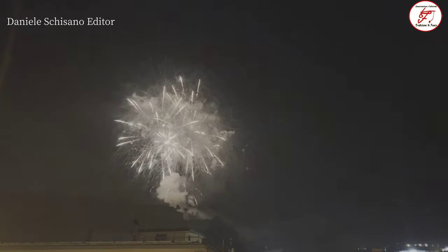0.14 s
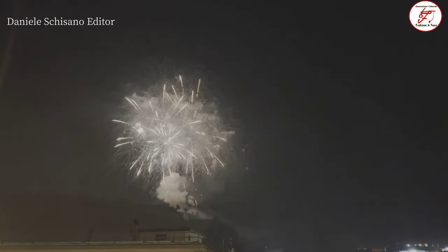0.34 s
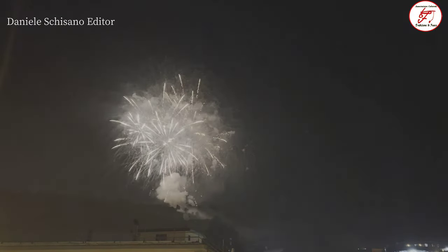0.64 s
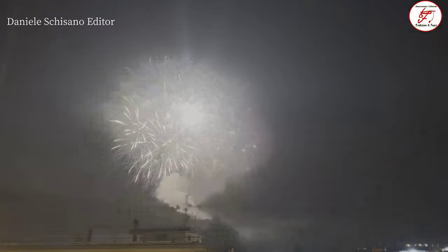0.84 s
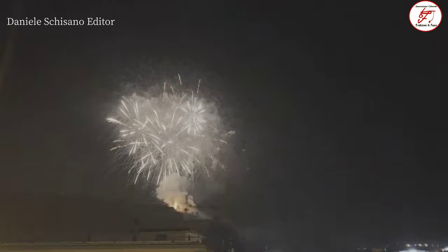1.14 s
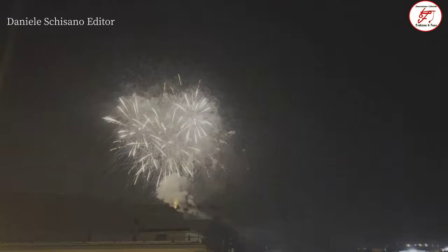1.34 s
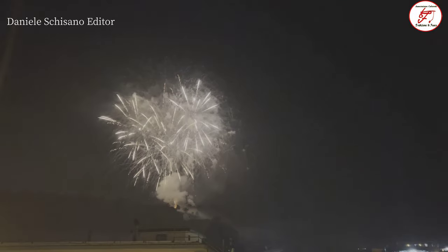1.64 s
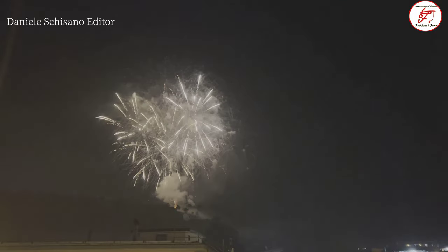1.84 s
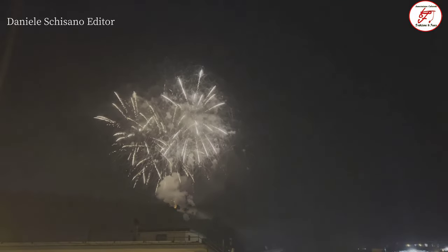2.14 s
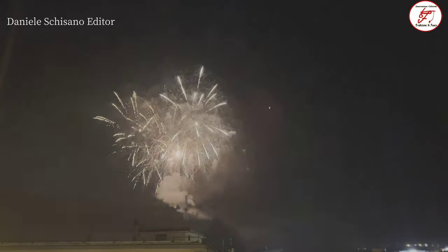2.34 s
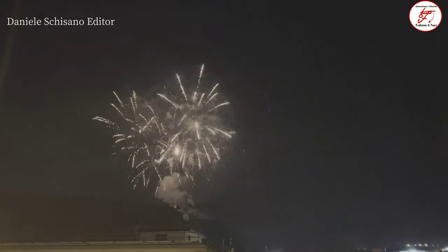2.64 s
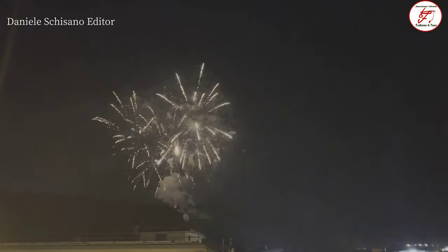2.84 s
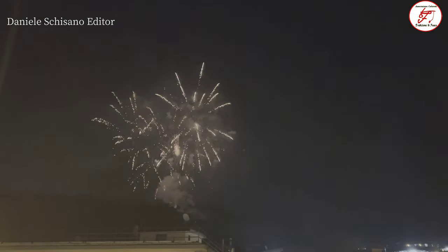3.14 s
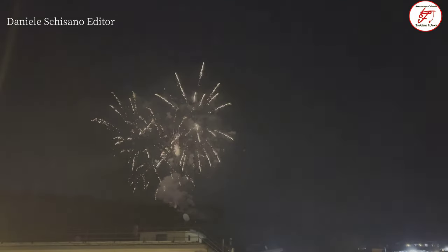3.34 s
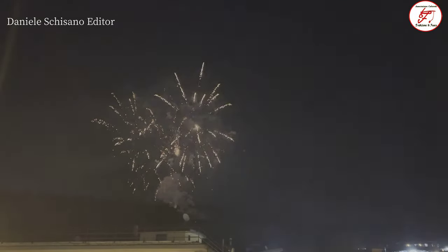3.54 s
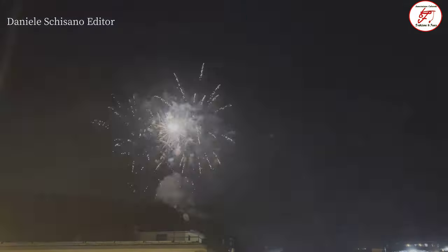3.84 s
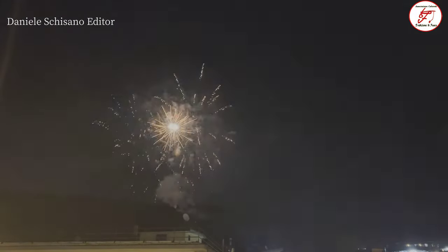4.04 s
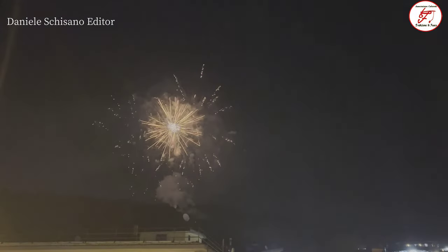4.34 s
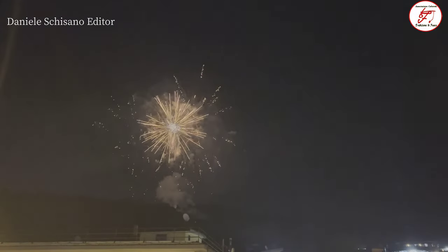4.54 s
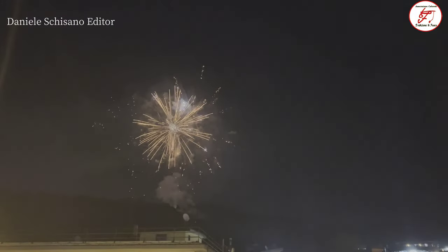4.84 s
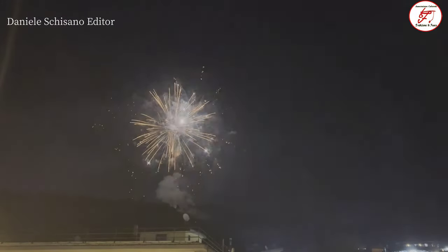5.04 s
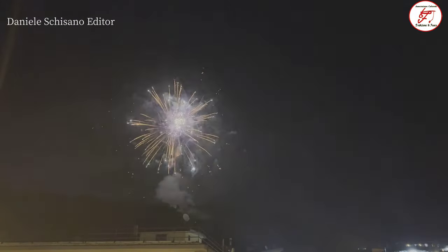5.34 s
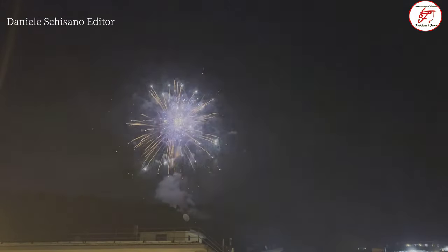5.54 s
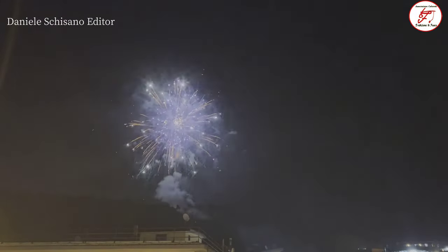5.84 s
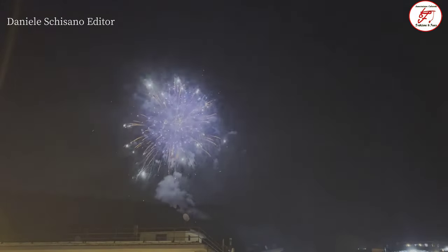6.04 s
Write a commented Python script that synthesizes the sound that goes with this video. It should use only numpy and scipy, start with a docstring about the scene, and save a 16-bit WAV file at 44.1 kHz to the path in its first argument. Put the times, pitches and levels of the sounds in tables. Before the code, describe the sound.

Fireworks burst some way off above a town at night. Each is a short, punchy crack with a quick downward sweep into bass, slapped back by nearby walls and followed by rolling echoes. Bangs come unevenly, single and clustered, with muffled thuds among them and barely audible clicks nearby. Outdoor rooftop microphone, lightly squashed peaks, soft background hiss.

```python
"""Night fireworks heard from a roof

Shells burst over a murmuring town, low booms thud among them, a few faint snaps click nearby.
Each blast is one short pressure pulse; walls slap it back, the town returns a long rolling echo.
Murmur, hiss and snaps are filtered noise.
The microphone delays bass behind treble, so every bang sweeps quickly downwards."""
import sys
import numpy as np
from scipy import signal
from scipy.fft import rfft, irfft, next_fast_len
from scipy.io import wavfile
from scipy.ndimage import uniform_filter1d

SR = 44100
rng = np.random.default_rng(int(sys.argv[2]) if len(sys.argv) > 2 else 0)


def generate_wav(sig):
    """Save sig (samples, or channels by samples) to the path in sys.argv[1] as 16-bit PCM at SR."""
    pcm = np.round(np.clip(np.atleast_2d(sig).T, -1, 1) * 32767).astype(np.int16)
    wavfile.write(sys.argv[1], SR, pcm)


N = 272802
RESPONSE_SAMPLES = 3 * 2 ** 15
FREQS_HZ = np.fft.rfftfreq(RESPONSE_SAMPLES, 1 / SR)

# night murmur spectrum, relative: freq_hz, density_db_per_hz
NIGHT_SPECTRUM = [(20, -14), (50, -3), (100, 0), (190, -4), (400, -9.5), (800, -15.5), (1500, -29.5),
                  (2600, -36), (3700, -46), (6000, -51), (9000, -68), (16000, -74)]
# likeness of the two ears in diffuse sound: freq_hz, correlation (-1..1)
EAR_LIKENESS = [(60, 0.96), (130, 0.95), (290, 0.6), (640, -0.53), (1400, -0.2), (3100, 0.1), (6500, 0.15),
                (10000, 0.6)]
# shell bursts; the first is over, only its echo is left: start_s, level_db, boom_hz, air_cut_hz, town_db
SHELLS = [(-0.8, 5.5, 150, 9000, 0), (0.2167, 6.8, 155, 6400, -2.8), (0.7261, 5.8, 150, 7200, -0.2),
          (1.8754, 5.5, 152, 17000, -0.5), (2.2635, 5.7, 154, 14600, -0.3), (2.7497, 7.5, 159, 17000, -1.5),
          (4.2023, 4, 212, 4200, -3.2), (5.5388, 6.3, 157, 17000, 0), (5.7070, 4.5, 150, 15000, -0.5),
          (5.7192, 3, 152, 15000, 0.7), (5.7583, 4.9, 148, 17000, 2.1)]
# low booms and thuds, the first with a ragged crack, the others dull: start_s, level_db, boom_hz, air_cut_hz
LOW_BOOMS = [(2.8828, -1.3, 87, 2900), (4.224, -11.5, 52, 130), (4.639, -22.5, 52, 200),
             (5.975, -1, 130, 280)]
# left channel's lead for sound straight from the fireworks: freq_hz, lead_rad
LEFT_LEAD = [(100, 0), (1500, 0.5), (3800, 1.75), (6500, 1.3), (8500, 0.7), (11000, 1), (13000, 0.2)]
# roof underfoot and parapet: delay_s, level_db, bass_cut_hz, treble_cut_hz, right_lag_ms
ROOF_ECHOES = [(0.0017, -14, 3000, 24000, -0.095), (0.00303, -10, 2000, 12000, 0.03),
               (0.0042, -19, 300, 11000, -.05)]
# walls around: delay_s, level_db, bass_cut_hz, treble_cut_hz, right_lag_ms
WALL_ECHOES = [(0.0245, -16, 100, 5000, 0.012), (0.0280, -17, 1500, 9000, -.3),
               (0.0340, -20.5, 50, 500, .6), (0.0590, -25, 200, 3500, .1), (0.0787, -23, 200, 2800, -.1),
               (0.1110, -14.3, 146, 3000, 0.0051)]
# near streets' echo against the blast: freq_hz, level_db
STREETS_LEVEL = [(40, 4), (80, -6.7), (160, -5.2), (300, -6.8), (700, -5.2), (2000, -6.4), (4000, -4.3),
                 (6000, -0.8), (9000, -1.3), (15000, -4)]
# near streets' decay: freq_hz, t60_s
STREETS_T60 = [(60, 1.36), (250, 1.42), (1000, 1.38), (4000, 1.45), (8000, 1.12), (14000, 0.24)]
# far echo against the blast: freq_hz, level_db
FAR_LEVEL = [(40, -8.5), (80, -15.5), (200, -11), (500, -17), (1500, -21.5), (4000, -17.5), (10000, -38)]
# far decay: freq_hz, t60_s
FAR_T60 = [(60, 4.2), (300, 2.86), (1500, 6.5), (8000, 0.47)]
# small snaps nearby: start_s, level_db, centre_hz, t60_s
SNAPS = [(3.334, -59, 4530, 0.027), (4.6185, -43, 4280, 0.0078), (4.6190, -45, 1180, 0.075),
         (4.9538, -54, 1260, .08)]
# overall colour of the sound: freq_hz, gain_db
OVERALL_COLOUR = [(110, 1.6), (220, 2.5), (350, -2), (460, 2.4), (660, -0.5), (780, 1.7), (950, -0.2),
                  (2800, 3.2), (4100, 3.7), (5200, 6.5), (9000, 5.3), (10200, 1), (11700, 11), (13800, -4),
                  (15200, -2.5), (16500, -24)]
# right channel against left: freq_hz, gain_db
RIGHT_COLOUR = [(100, 0.4), (700, 0.7), (2500, 0.3), (3500, -3), (4800, -5.7), (6500, -6), (8500, -1.3),
                (15000, 1)]

NIGHT_DB, HISS_DB = -47.5, -76  # RMS ahead of the overall colour
SHELL_Q, SHELL_FRONT_HZ = 1.15, 1450
LOW_BOOM_Q, LOW_BOOM_FRONT_HZ = 0.9, 3500
# rooftop scatter is relative to the town echo
SHELL_WALLS_DB, SHELL_ROOFTOPS_DB, SHELL_ROOFTOPS_T60_S = 0.5, -13, 0.056
LOW_BOOM_WALLS_DB, LOW_BOOM_ROOFTOPS_DB, LOW_BOOM_ROOFTOPS_T60_S = -7, 0, 0.16
LOW_BOOM_TOWN_DB = 0.5
BAND_EDGE_HZ = 16500


def amp(db):
    """Decibels to gain."""
    return 10 ** (np.asarray(db) / 20)


def read(points, hz):
    """Reads a spectrum table, linear over log frequency."""
    f, value = np.transpose(points)
    return np.interp(np.log(hz + 1), np.log(f + 1), value)


def add(mix, start_s, sound):
    """Mixes in a stereo sound; what lies before time zero is dropped."""
    at = round(start_s * SR)
    sound = sound[:, max(-at, 0):]
    part = mix[:, max(at, 0):][:, :sound.shape[1]]
    part += sound[:, :part.shape[1]]


def diffuse(size):
    """White noise from all around; ear likeness varies with frequency."""
    left, other = rfft(rng.standard_normal((2, size)))
    same = np.clip(read(EAR_LIKENESS, np.fft.rfftfreq(size, 1 / SR)), -1, 1)
    right = same * left + np.sqrt(1 - same ** 2) * other
    return irfft(np.array([left, right]), size)


def band(x, hz, width_hz):
    """Keeps a bell-shaped band at unit RMS."""
    f = np.fft.rfftfreq(x.shape[-1], 1 / SR)
    bell = np.exp(-((f - hz) / width_hz) ** 2)
    kept = irfft(rfft(x) * bell, x.shape[-1])
    return kept / kept.std()


def lowpass(cut_hz):
    """Response of a causal two-pole low-pass."""
    s = 1j * FREQS_HZ / cut_hz
    return 1 / (1 + np.sqrt(2) * s + s * s)


def night():
    """Steady murmur of distant traffic and air as shaped noise, with a thin narrow hiss."""
    size = next_fast_len(N)
    spectrum = amp(read(NIGHT_SPECTRUM, np.fft.rfftfreq(size, 1 / SR)))
    wash = irfft(rfft(diffuse(size)) * spectrum, size)[:, :N]
    hiss = amp(HISS_DB) * band(diffuse(size), hz=3077, width_hz=196)[:, :N]
    return wash / wash.std() * amp(NIGHT_DB) + hiss


def blast(boom_hz, q, front_hz, air_hz):
    """Spectrum of a pressure jump that swings back into suction; distance rounds its front."""
    s = 1j * FREQS_HZ
    swing = s / (s * s + s * boom_hz / q + boom_hz ** 2)
    return SR / (2 * np.pi) * swing / (1 + s / front_hz) * lowpass(air_hz)


def arrival(delay_s, lag_ms):
    """Response of one path to the two ears: pure delays."""
    ear_delays_s = np.array([[delay_s], [delay_s + lag_ms / 1000]])
    return np.exp(-2j * np.pi * FREQS_HZ * ear_delays_s)


def reflections(rows):
    """Sum of single echoes: a small surface returns no bass, a rough one no treble."""
    s = 1j * FREQS_HZ
    total = 0
    for delay_s, level_db, low_hz, top_hz, lag_ms in rows:
        surface = s / (s + low_hz) * lowpass(top_hz)
        total = total + amp(level_db) * surface * arrival(delay_s, lag_ms)
    return total


def scatter(t60_s, low_hz, size=8192):
    """Response of many small surfaces close together: a brief ragged burst with weak bass."""
    burst = diffuse(size) * np.exp(-np.log(1000) * np.arange(size) / SR / t60_s)
    highpass = (1j * FREQS_HZ / low_hz) ** 2 * lowpass(low_hz)
    return rfft(burst / np.linalg.norm(burst[0]), RESPONSE_SAMPLES) * highpass


def facades(per_s=240, spread_db=3.5, top_hz=2600):
    """Randomly timed single echoes from house fronts on all sides, a few of them strong."""
    count = 1000
    gap, size, side = rng.random((3, count))
    at = 40 + (np.cumsum(-np.log(gap)) * SR / per_s).astype(int)
    height = amp(spread_db * np.minimum(-np.log(size), np.pi)) * rng.choice([-1, 1], count)
    lag = np.round(24 * side - 12).astype(int)  # samples
    inside = at < RESPONSE_SAMPLES - 40
    taps = np.zeros((2, RESPONSE_SAMPLES))
    taps[0, at[inside]] = height[inside]
    taps[1, (at + lag)[inside]] = height[inside]
    return irfft(rfft(taps / taps.std()) * lowpass(top_hz))


def dying(colour, t60s, hz, t_s, rise_s):
    """Power over frequency and time of an echo that builds up and dies by band."""
    life_s = np.maximum(read(t60s, hz), .01)[:, None] / np.log(10 ** 6)
    power = amp(read(colour, hz))[:, None] ** 2 / (life_s * SR)
    return power * np.exp(-t_s / life_s) * (1 - np.exp(-(t_s / rise_s) ** 2))


def town_echoes(count, lumps_db=1.7):
    """Rolling echoes for different places in the sky; house blocks make them grainy and lumpy."""
    noises = np.array([.8 * diffuse(RESPONSE_SAMPLES) + .6 * facades() for _ in range(count)], np.float32)
    hz, t_s, z = signal.stft(noises, SR, nperseg=512)
    power = dying(STREETS_LEVEL, STREETS_T60, hz, t_s, rise_s=.02)
    power = power + dying(FAR_LEVEL, FAR_T60, hz, t_s, rise_s=0.24)
    lumps = uniform_filter1d(rng.standard_normal((count, 1, 1, len(t_s))), size=6, axis=-1)  # about 35 ms
    z *= np.sqrt(power).astype(np.float32)
    z *= amp(lumps_db * lumps / lumps.std()).astype(np.float32)
    return rfft(signal.istft(z, SR, nperseg=512)[1][..., :RESPONSE_SAMPLES])


def fireworks():
    """Each blast arrives straight, off the roof, off rough walls and through the town."""
    out, towns = np.zeros((2, N)), town_echoes(count=5)
    straight = np.exp(-1j * np.outer([0, 1], read(LEFT_LEAD, FREQS_HZ)))
    near = straight + reflections(ROOF_ECHOES)
    walls = reflections(WALL_ECHOES)
    fade = np.minimum(np.linspace(10, 0, RESPONSE_SAMPLES), 1)

    def heard(k, pulse, walls_db, rooftops_db, rooftops_t60_s, town_db):
        """One pulse over all paths; railings and rooftops scatter each blast differently."""
        railings = amp(-6) * scatter(t60_s=0.035, low_hz=3000)
        rooftops = amp(rooftops_db) * scatter(t60_s=rooftops_t60_s, low_hz=650)[0] * straight
        roughness = 1 + amp(-4.5) * scatter(t60_s=0.016, low_hz=900)
        slaps = amp(walls_db) * walls * roughness
        town = amp(town_db) * (rooftops + towns[k % len(towns)])
        return fade * irfft(pulse * (near + railings + slaps + town))

    for k, (start_s, level_db, boom_hz, air_hz, town_db) in enumerate(SHELLS):
        pulse = amp(level_db) * blast(boom_hz, SHELL_Q, SHELL_FRONT_HZ, air_hz)
        sound = heard(k, pulse, SHELL_WALLS_DB, SHELL_ROOFTOPS_DB, SHELL_ROOFTOPS_T60_S, town_db)
        add(out, start_s, sound)
    for k, (start_s, level_db, boom_hz, air_hz) in enumerate(LOW_BOOMS, len(SHELLS)):
        pulse = amp(level_db) * blast(boom_hz, LOW_BOOM_Q, LOW_BOOM_FRONT_HZ, air_hz)
        sound = heard(k, pulse, LOW_BOOM_WALLS_DB, LOW_BOOM_ROOFTOPS_DB, LOW_BOOM_ROOFTOPS_T60_S,
                      LOW_BOOM_TOWN_DB)
        add(out, start_s, sound)
    return out


def snaps():
    """Faint soft clicks: each a decaying puff of noise in one broad band."""
    out, t_s = np.zeros((2, N)), np.arange(8192) / SR
    onset = np.minimum(t_s / .002, 1)
    for start_s, level_db, centre_hz, t60_s in SNAPS:
        puff = band(diffuse(len(t_s)), centre_hz, centre_hz / 2)
        decay = np.exp(-np.log(1000) * t_s / t60_s)
        add(out, start_s, amp(level_db) * puff * onset * decay)
    return out


def scene():
    """Blasts, their echoes and snaps over the quiet town."""
    return night() + fireworks() + snaps()


def microphone(hz, low_hz=46, order=6):
    """Steep low cut and overall colour; all-pass stages hold the bass back by about 12 ms."""
    turn_hz = 160
    s = 1j * hz
    left_db = read(OVERALL_COLOUR, hz)
    colour = amp([left_db, left_db + read(RIGHT_COLOUR, hz)])
    low_cut = signal.freqs(*signal.butter(order, low_hz, "high", analog=True), hz)[1]
    return colour * low_cut * ((turn_hz - s) / (turn_hz + s)) ** order


def record(dry):
    """Microphone response and overall colour, a soft ceiling on the peaks, then the band limit."""
    size = next_fast_len(N + SR)
    response = microphone(np.fft.rfftfreq(size, 1 / SR))
    heard = irfft(rfft(dry, size) * response, size)[:, :N]
    heard = heard / (1 + (heard / .97) ** 8) ** (1 / 8)
    band_limit = signal.firwin(511, BAND_EDGE_HZ, window=("kaiser", 9), fs=SR)
    return signal.oaconvolve(heard, band_limit[None], "same", axes=1)


dry = scene()
out = record(dry)
generate_wav(out)
```